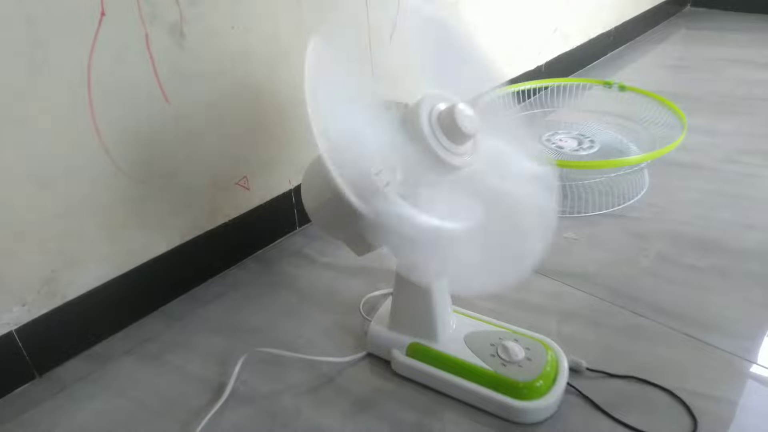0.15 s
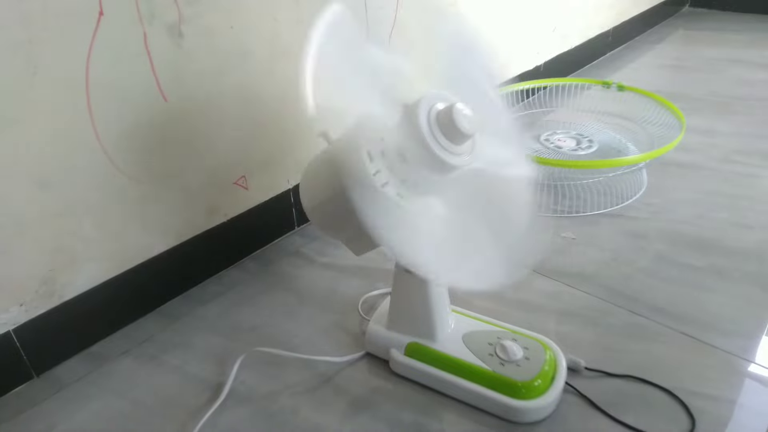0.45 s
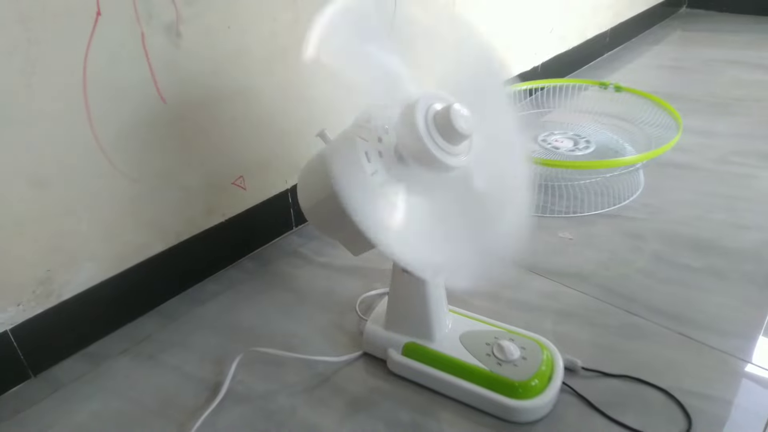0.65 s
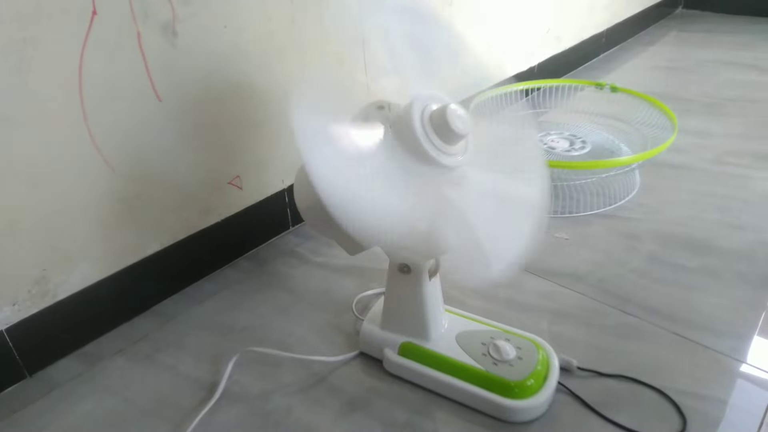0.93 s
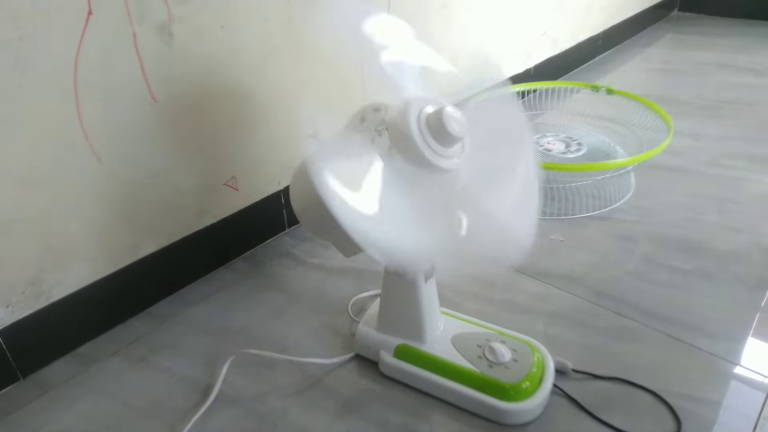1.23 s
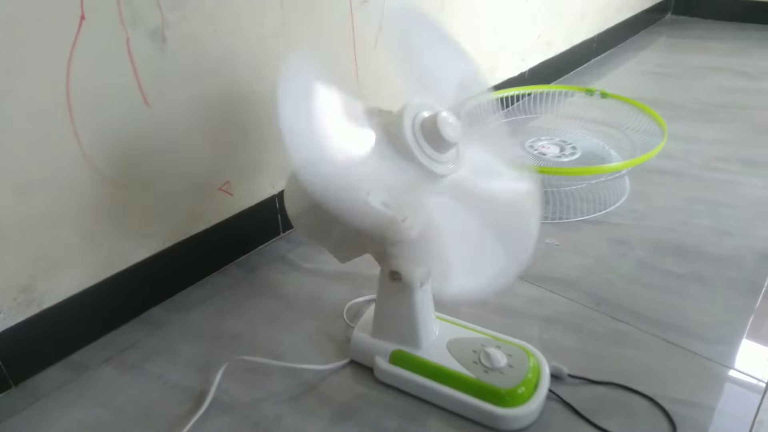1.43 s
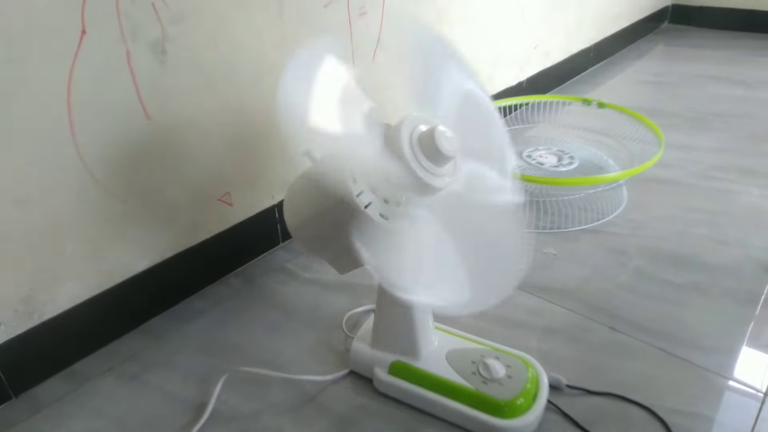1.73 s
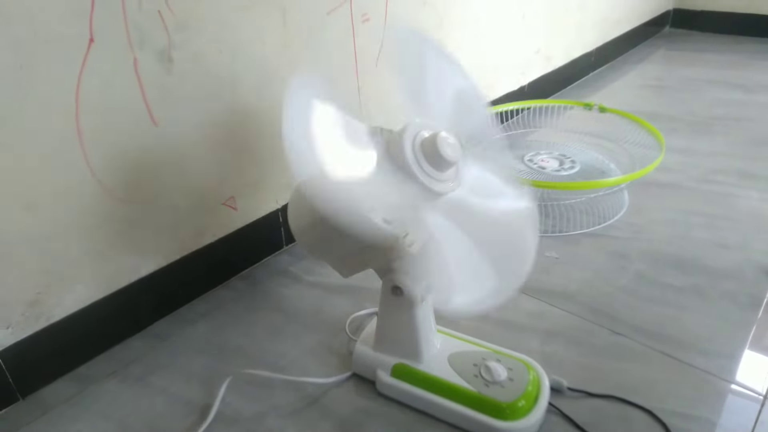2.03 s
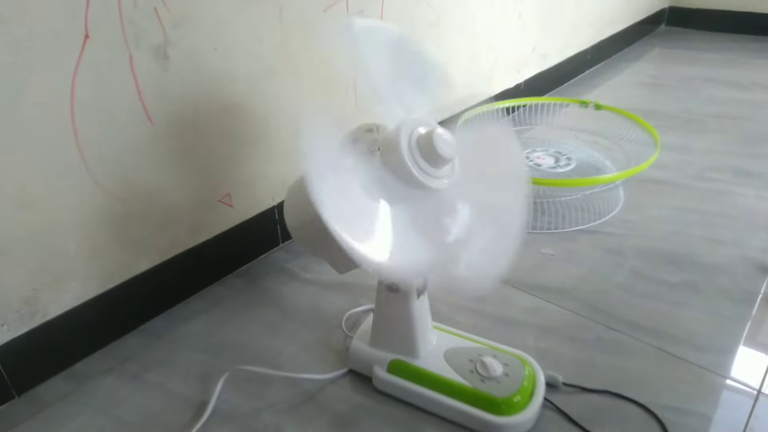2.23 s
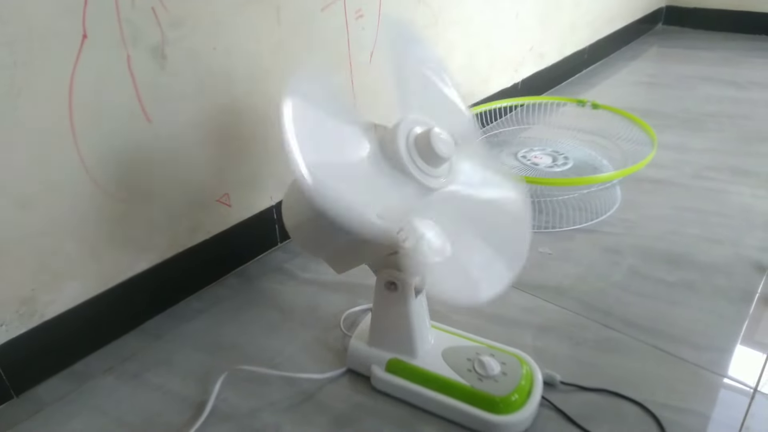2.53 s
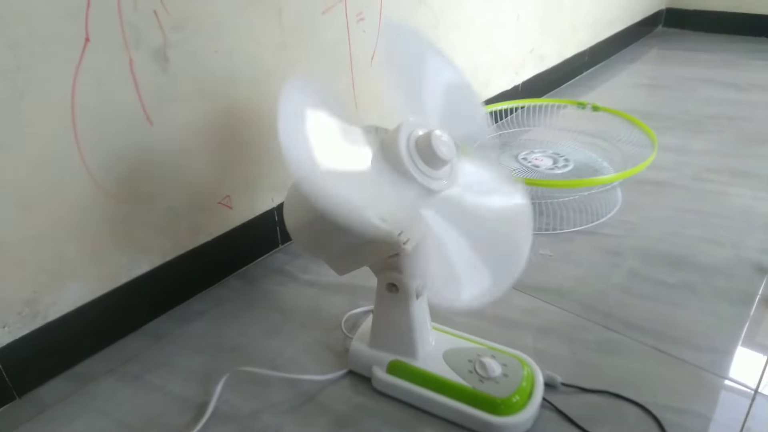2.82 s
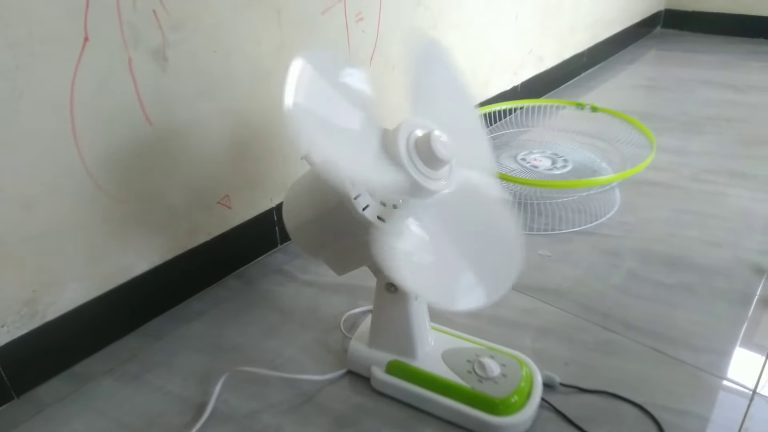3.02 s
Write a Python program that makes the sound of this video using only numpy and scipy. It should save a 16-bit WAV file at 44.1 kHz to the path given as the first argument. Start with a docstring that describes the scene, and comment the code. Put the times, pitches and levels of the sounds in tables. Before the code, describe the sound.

Wavering low fan motor hum and soft air whoosh, then a burst of hard clacks.

```python
"""Wavering hum tones, a low rumble and a soft whoosh swell and ebb: a vehicle passing outside, its rumble
stirring the room's resonances. The hum is four wandering sines; rumble and whoosh are seven noise bands.
Early on come a faint hollow knock (narrow noise) and three faint ticks; near the end a soft noise rustle,
then five louder clacks of a hard small object, stronger on the left. Clacks and ticks are short damped
sines with early echoes and a diffuse noise tail. Faint microphone noise lies under it all."""
import sys
import numpy as np
from scipy import signal
from scipy.fft import rfft, irfft, next_fast_len
from scipy.io import wavfile

SR = 44100
rng = np.random.default_rng(int(sys.argv[2]) if len(sys.argv) > 2 else 0)


def dump_mix(stems):
    """Bounce the given channels to the path in sys.argv[1] as a 16-bit WAV at rate SR."""
    frames = np.atleast_2d(stems).T  # one column per channel
    limited = np.clip(frames, -1, 1)  # hard clip at full scale
    pcm = np.round(limited * 32767).astype(np.int16)
    wavfile.write(sys.argv[1], SR, pcm)


N = 139797
LEFT_LAG_S = 0.00045  # sound shared by both ports reaches the left one this much later


def amp(db):
    """Decibels to linear gain."""
    return 10 ** (np.asarray(db) / 20)


def rms_one(x):
    """Scale a signal to an rms of 1."""
    return x / np.sqrt(np.mean(x ** 2) + 1e-20)


def at_hz(points, hz, outside=None):
    """Read a table on a log-frequency axis; beyond its ends hold the end values or use `outside`."""
    table_hz, values = np.transpose(points)
    return np.interp(np.log(np.maximum(hz, 1)), np.log(table_hz), values, outside, outside)


def in_time(rows):
    """Draw each column of a timed table as straight lines between its rows."""
    start_s, *columns = np.transpose(rows)
    t = np.arange(N) / SR
    return [np.interp(t, start_s, column) for column in columns]


def drift(rate_per_s):
    """Random wander of rms 1: white noise through a two-pole lowpass, run at every 40th sample."""
    pole = np.exp(-80 * np.pi * rate_per_s / SR)
    white = rng.standard_normal(N // 40 + 2002)
    slow = signal.lfilter([1], [1, -2 * pole, pole * pole], white)[2000:]  # drop the filter's start-up
    return np.interp(np.arange(N) / 40, np.arange(len(slow)), rms_one(slow))


# How alike left and right noise are across the spectrum: pitch_hz [Hz], shared_power [0-1]
STEREO_LIKENESS = [(60, 0.97), (220, 0.91), (420, 0.69), (810, .4), (1500, 0.41), (3000, 0.079), (6000, .3),
                   (9000, .2)]


def noise(spectrum, lag_s=0.):
    """Coloured stereo noise, part shared and part separate per side, with a mid rms of 1."""
    size = next_fast_len(N)
    hz = np.arange(size // 2 + 1) * SR / size
    shared, left, right = rfft(rng.standard_normal((3, size)))
    alike = np.clip(at_hz(STEREO_LIKENESS, hz), 0, 1)
    delay = np.exp(-2j * np.pi * hz * np.c_[[lag_s, 0]])  # left side only
    pair = np.sqrt(alike) * shared * delay + np.sqrt(1 - alike) * np.array([left, right])
    out = irfft(pair * amp(at_hz(spectrum, hz, -120)), size)[:, :N]
    return out / np.sqrt(np.mean(out.mean(axis=0) ** 2))


# Rms levels of the four hum tones before their quick waver:
# start_s [s], tone_1_db, tone_2_db, tone_3_db, tone_4_db [dB]
HUM_LEVELS = [(0.0, -46, -44, -55.5, -48), (0.08, -37, -39, -49.5, -45), (0.45, -38.5, -28.5, -43, -40),
              (0.86, -27, -33.5, -33, -36.5), (1.092, -35.5, -26.5, -36.5, -31),
              (1.2, -25, -28.5, -37, -34), (1.31, -25, -30.5, -30.5, -39), (1.36, -43, -36.5, -36.5, -49.5),
              (1.49, -21, -37, -39.5, -34.5), (1.56, -30, -28, -38, -49.5), (1.61, -30, -34.5, -48, -60),
              (1.67, -45.5, -45.5, -39, -34), (1.78, -31.5, -30, -42, -43), (1.849, -36, -43.5, -37.5, -40),
              (1.899, -29.5, -47.5, -56.5, -46), (1.97, -48.5, -36.5, -45, -37.5),
              (2.07, -24, -50, -55, -46), (2.14, -47.5, -41, -44, -43.5), (2.27, -26, -41, -48, -35.5),
              (2.38, -29, -37.5, -46.5, -52.5), (2.52, -40, -36, -38, -53.5),
              (2.66, -26.5, -45, -42.5, -35.5), (2.74, -36.5, -40.5, -36, -56),
              (2.97, -36.5, -44.5, -50, -34.5), (3.079, -36.5, -43, -62, -74),
              (3.17, -53.5, -35.5, -49.5, -45.5)]
# Centre pitch of each tone: pitch_hz [Hz]
HUM_PITCHES = [85.64, 231.6, 283.2, 315.3]
# Rms pitch wander of each tone: wander_hz [Hz]
HUM_WANDERS = [1.97, 1.77, 3.0, 4.96]
HUM_WANDER_PER_S = 2.896
HUM_BREAKUP_DB, HUM_BREAKUP_PER_S = 1.5, 11  # quick level waver, separate for each tone


def hum():
    """Four sines whose pitch wanders a little while their level wavers."""
    total = 0
    for level_db, pitch_hz, wander_hz in zip(in_time(HUM_LEVELS), HUM_PITCHES, HUM_WANDERS):
        level = amp(level_db + HUM_BREAKUP_DB * drift(HUM_BREAKUP_PER_S))
        moving_hz = pitch_hz + wander_hz * drift(HUM_WANDER_PER_S)
        cycles = np.cumsum(moving_hz) / SR + rng.random()
        total = total + np.sqrt(2) * level * np.sin(2 * np.pi * cycles)
    return total


# Noise band levels before flutter and flicker:
# start_s [s], deep_db, rumble_db, boom_db, whoosh_db, hiss_db, high_hiss_db [dB]
BAND_LEVELS = [(0.0, -57.5, -43, -34.5, -47.5, -53.5, -66.5), (0.031, -28.5, -27.5, -41, -44.5, -51.5, -68),
               (0.141, -35.5, -36, -41.5, -43.5, -51.5, -64.5), (0.59, -29, -30, -34.5, -42.5, -49, -61),
               (1.07, -35, -33, -35.5, -41, -47.5, -61), (1.84, -31.5, -30.5, -36.5, -44, -50, -65.5),
               (1.99, -37, -35.5, -39.5, -46.5, -50.5, -66), (2.079, -25, -31, -41, -45.5, -51, -66.5),
               (2.25, -40, -37, -38.5, -48, -53, -68), (2.29, -29.5, -33.5, -36.5, -46.5, -50.5, -67),
               (2.38, -25.5, -37, -37, -48.5, -52.5, -68), (2.52, -37.5, -34, -43, -45, -50, -64),
               (2.61, -27.5, -32.5, -33.5, -51, -52, -69), (2.699, -40, -42, -44, -48, -54.5, -63),
               (2.83, -35.5, -37.5, -40, -49.5, -49.5, -65), (3.03, -45, -37.5, -40, -52.5, -55.5, -61),
               (3.17, -32.5, -39, -50.5, -51, -55.5, -69)]
# Level of the low whoosh before flutter and flicker: start_s [s], level_db [dB]
LOW_WHOOSH_LEVEL = [(0.0, -43), (0.09, -47.5), (0.38, -41), (2.33, -42.5), (2.35, -48.5), (2.44, -45),
                    (2.74, -48), (2.75, -52.5), (2.93, -49.5), (3.17, -53.5)]
# Colours of the seven bands, from deep rumble to high hiss, each: pitch_hz [Hz], density_db [dB per Hz]
DEEP_COLOUR = [(30, -30), (40, -7), (50, -5), (62, 0), (73, -5), (90, -14.5), (105, -29.5)]
RUMBLE_COLOUR = [(75, -45), (100, 0), (113, -6), (126, -4), (139, 1), (155, -14), (178, -6), (208, -11.5),
                 (240, -6.5), (270, -24)]
BOOM_COLOUR = [(230, -13.5), (256, -1), (268, -1), (283, -6), (300, 1.5), (318, -7.5), (335, -3),
               (356, -2.5), (385, -21)]
LOW_WHOOSH_COLOUR = [(365, -18.5), (399, 0.5), (454, 3), (495, -3), (530, -22)]
WHOOSH_COLOUR = [(400, -30), (500, -8.5), (553, -3.5), (714, -9), (964, -9), (1140, -13.5), (1250, -26.5),
                 (1620, -60.5), (2750, -120)]
HISS_COLOUR = [(710, -25), (1200, 0), (1260, 0.5), (2170, -5), (2490, -6), (2710, -5.5), (3600, -15.5),
               (4680, -49), (7920, -120)]
HIGH_HISS_COLOUR = [(2120, -22), (3600, -5), (5400, -16), (6200, -18), (8060, -38.5), (13600, -120)]
FLUTTER_DB, FLUTTER_PER_S = 0.41, 16  # quick flutter shared by all the bands
FLICKER_PER_S = 7.8


def rumble_and_whoosh():
    """Seven noise bands of rumble and whoosh, each flickering a little, with a flutter in common."""
    levels = in_time(BAND_LEVELS) + in_time(LOW_WHOOSH_LEVEL)
    bands = [  # colour, lag_s, flicker_db
        (DEEP_COLOUR, 0, 1.7), (RUMBLE_COLOUR, 0, 1.1), (BOOM_COLOUR, 0, 1.4), (WHOOSH_COLOUR, 0, 0.73),
        (HISS_COLOUR, LEFT_LAG_S, 0.41), (HIGH_HISS_COLOUR, LEFT_LAG_S, 0.71), (LOW_WHOOSH_COLOUR, 0, 1.2)]
    flutter_db = FLUTTER_DB * drift(FLUTTER_PER_S)
    total = 0
    for level_db, (colour, lag_s, flicker_db) in zip(levels, bands):
        moving_db = level_db + flutter_db + flicker_db * drift(FLICKER_PER_S)
        total = total + amp(moving_db) * noise(colour, lag_s)
    return total


# Colour of the microphone noise: pitch_hz [Hz], density_db [dB per Hz]
MICROPHONE_COLOUR = [(7000, -0.5), (8200, -8.5), (9500, -1.5), (12000, -1), (13500, -9), (14500, -22)]


def microphone_noise():
    """Faint steady treble noise from the microphone."""
    return amp(-80.5) * noise(MICROPHONE_COLOUR)


KNOCK_S, KNOCK_ATTACK_S, KNOCK_T60_S = 0.208, 0.004, 0.8
KNOCK_HZ, KNOCK_WIDTH_HZ, KNOCK_DB = 870, 120, -43


def knock():
    """A faint hollow knock just ahead of the first ticks: narrow noise, quick rise, exponential fade."""
    t = np.arange(N) / SR - KNOCK_S
    colour = [(KNOCK_HZ - KNOCK_WIDTH_HZ, -15), (KNOCK_HZ, 0), (KNOCK_HZ + KNOCK_WIDTH_HZ, -15)]
    rise = np.clip(t / KNOCK_ATTACK_S, 0, 1) ** 2
    fade = amp(KNOCK_DB - 60 * np.maximum(t, 0) / KNOCK_T60_S)
    return rise * fade * noise(colour)


def ring(hz, cycles):
    """A few cycles that swell and stop: a heavily damped ring."""
    t = np.arange(300) / SR
    swell = np.sin(np.pi * np.minimum(t * hz / cycles, 1)) ** 2
    return np.sin(2 * np.pi * hz * t) * swell


# Ticks and clacks; level is the body's peak before the room, the other levels relative:
# start_s [s], level_db [dB], pitch_hz [Hz], undertone_db [dB], second_hz [Hz], second_db [dB],
# brightness_db [dB], room_send_db [dB]
CLACK_HITS = [(0.2112, -30, 2750, 4, 4210, -23, -16, -10.5), (0.2347, -33, 2900, 1, 4070, -6.5, -7, -6),
              (0.2608, -39.5, 2950, -18.5, 4700, -14.5, -3, 3.5),
              (2.6539, -13, 2900, -6, 4320, -6.5, -4.5, -0.5),
              (2.7279, -21.5, 2243, -13, 4850, -16, -19, 3.5),
              (2.7985, -19.5, 3010, -8.5, 4750, -8.5, -5.5, 5),
              (2.8965, -29, 2220, -13, 4700, -22, -1.5, 3.5),
              (2.9327, -22.5, 2860, -13, 4580, -7, -3.5, 1.5)]
# Rings common to every hit, one low and the rest higher: pitch_hz [Hz], level_db [dB], length [cycles]
COMMON_RINGS = [(1480, -16.5, 4.2), (3560, -7, 11), (5350, -17.5, 7.5), (5700, -10, 5.4), (7340, -21, 3.3)]
# Highest rings common to every hit: pitch_hz [Hz], level_db [dB], length [cycles]
TOP_RINGS = [(9440, -22, 5.7), (11120, -24.5, 8), (13200, -29.5, 9.0), (14170, -31, 9.0)]
CLACK_CYCLES, SECOND_CYCLES = 4.68, 8.4
UNDERTONE_RATIO = 0.738  # undertone pitch over main pitch
TOP_DIRECT_DB = 0  # extra level of the top rings on the direct path


def clacks():
    """Hard hits with damped rings of their own and shared ones; rows: direct sound, send to the room tail."""
    out = np.zeros((2, N + 300))
    common = sum(amp(db) * ring(hz, cycles) for hz, db, cycles in COMMON_RINGS)
    top = sum(amp(db) * ring(hz, cycles) for hz, db, cycles in TOP_RINGS)
    for start_s, level_db, hz, under_db, second_hz, second_db, bright_db, room_db in CLACK_HITS:
        body = ring(hz, CLACK_CYCLES)
        body = body + amp(under_db) * ring(UNDERTONE_RATIO * hz, CLACK_CYCLES)
        body = body + amp(second_db) * ring(second_hz, SECOND_CYCLES)
        body = body + amp(bright_db) * common
        both = body + amp(bright_db + np.c_[[TOP_DIRECT_DB, 0]]) * top
        levels = amp([[level_db], [level_db + room_db]])
        start = int(start_s * SR)
        out[:, start:start + len(body)] += levels * both / np.abs(body).max()
    return out[:, :N]


# Arrival of the direct sound, then floor and wall echoes: delay_s [s]
ECHO_DELAYS = [0, .0021, .0037, .0100, .0148]
# Gain of each of those arrivals: level_db [dB]
ECHO_LEVELS = [2.5, -9, -9.5, -12.5, -10.5]
# Time for the tail to fall 60 dB: pitch_hz [Hz], decay_s [s]
TAIL_DECAY = [(1500, 0.27), (2500, 0.67), (4500, 0.52), (7000, 0.36), (12000, 0.55)]
# Tone colour of the tail: pitch_hz [Hz], level_db [dB]
TAIL_COLOUR = [(1400, 1), (2000, 4), (2800, -6), (4000, 5.5), (5600, -5), (8000, 10), (12000, 7.5)]
# Resonances the tail favours: pitch_hz [Hz], width_hz [Hz], boost_db [dB]
TAIL_RESONANCES = [(1940, 150, 1), (2230, 93, 4.5), (2780, 220, 5), (3410, 160, 3), (3910, 150, 5.5),
                   (4990, 180, 6.5), (5600, 200, 2), (6300, 200, 3)]
CLACK_LAG_S = 0.00042  # the direct sound and echoes reach the left port this much later
TAIL_DB, TAIL_BUILD_S, TAIL_LIKENESS = -23, 0.0043, 0.07
LATE_BUILD_S, LATE_SHARE = 0.022, 0.19  # part of the tail arrives late
GRAIN_DB, GRAIN_PER_S = 2.0, 90  # lumpiness of the tail


def room(direct, send):
    """Direct sound with a few early echoes, then a lumpy diffuse tail that dies band by band."""
    t = np.arange(SR) / SR
    hz = np.arange(SR // 2 + 1)
    shared, *own = rng.standard_normal((3, SR))
    shared_pair = np.array([np.roll(shared, int(LEFT_LAG_S * SR)), shared])
    alike = np.clip(TAIL_LIKENESS, 0, 1)
    white = np.sqrt(alike) * shared_pair + np.sqrt(1 - alike) * np.array(own)
    grain_db = GRAIN_DB * drift(GRAIN_PER_S)[:SR]
    boost_db = sum(db * np.exp(-((hz - peak_hz) / width_hz) ** 2 / 2)
                   for peak_hz, width_hz, db in TAIL_RESONANCES)
    resonant = irfft(rfft(white) * amp(boost_db), SR)

    tail = 0
    edges = 1000 * 2 ** np.arange(0, 4.1, .5)  # half-octave bands from 1 to 16 kHz
    for low, high in zip(edges, edges[1:]):
        band_filter = signal.butter(2, [low, high], "band", fs=SR, output="sos")
        band = signal.sosfilt(band_filter, resonant)
        centre_hz = np.sqrt(low * high)
        band_grain_db = grain_db + GRAIN_DB / 2 * drift(GRAIN_PER_S)[:SR]
        decay_db = -60 * t / at_hz(TAIL_DECAY, centre_hz)
        tail = tail + band * amp(band_grain_db + at_hz(TAIL_COLOUR, centre_hz) + decay_db)
    build = (1 - np.exp(-t / TAIL_BUILD_S)) * (1 - LATE_SHARE * np.exp(-t / LATE_BUILD_S))
    tail = tail * amp(TAIL_DB) * build

    early = np.zeros((2, SR))
    for delay_s, level_db in zip(ECHO_DELAYS, ECHO_LEVELS):
        early[0, int((delay_s + CLACK_LAG_S) * SR)] += amp(level_db)
        early[1, int(delay_s * SR)] += amp(level_db)
    near = signal.fftconvolve(direct[None], early, axes=1)
    diffuse = signal.fftconvolve(send[None], tail, axes=1)
    return (near + diffuse)[:, :N]


# Colour of the rustle: pitch_hz [Hz], density_db [dB per Hz]
RUSTLE_COLOUR = [(400, -14), (700, 10.5), (1500, -10), (3000, -7.5), (5000, -19), (7500, -32.5),
                 (10500, -36), (13500, -25)]
RUSTLE_PEAK_S, RUSTLE_RISE_S, RUSTLE_FALL_S, RUSTLE_DB = 2.53, 0.069, 0.081, -48


def rustle():
    """A brief soft swish: coloured noise under a lopsided bell-shaped swell with a slight quick flicker."""
    t = np.arange(N) / SR - RUSTLE_PEAK_S
    width_s = np.where(t < 0, RUSTLE_RISE_S, RUSTLE_FALL_S)
    swell = np.exp(-(t / width_s) ** 2 / 2)
    return amp(RUSTLE_DB + 1.0 * drift(30)) * swell * noise(RUSTLE_COLOUR, LEFT_LAG_S)


def scene():
    """Passing vehicle, knock, clacks in the room, rustle and microphone noise, mixed in stereo."""
    passing = hum() + rumble_and_whoosh()
    return passing + microphone_noise() + knock() + room(*clacks()) + rustle()


# Stereo balance: pitch_hz [Hz], left_minus_right_db [dB]
STEREO_BALANCE = [(60, 2.5), (100, 1), (170, 3), (270, -0.5), (460, 2), (760, 1), (1260, 2), (2090, 7.5),
                  (3460, 7), (5750, 3)]
TOP_BALANCE = (8500, 0.5)  # Hz, left minus right dB
CUTOFF_HZ = 14500


def record(dry):
    """Two microphone ports: the left is louder in the presence range, and a steep lowpass cuts the top."""
    padded = np.pad(dry, [(0, 0), (4096, 4096)], "reflect", reflect_type="odd")  # keeps the ends smooth
    size = padded.shape[1]
    hz = np.arange(size // 2 + 1) * SR / size
    tilt_db = at_hz(STEREO_BALANCE + [TOP_BALANCE], hz) / 2
    ports = irfft(rfft(padded) * amp([tilt_db, -tilt_db]), size)
    lowpass = signal.cheby2(12, 70, CUTOFF_HZ, fs=SR, output="sos")
    return signal.sosfilt(lowpass, ports)[:, 4096:-4096]


dry = scene()
out = record(dry)
dump_mix(out)
```